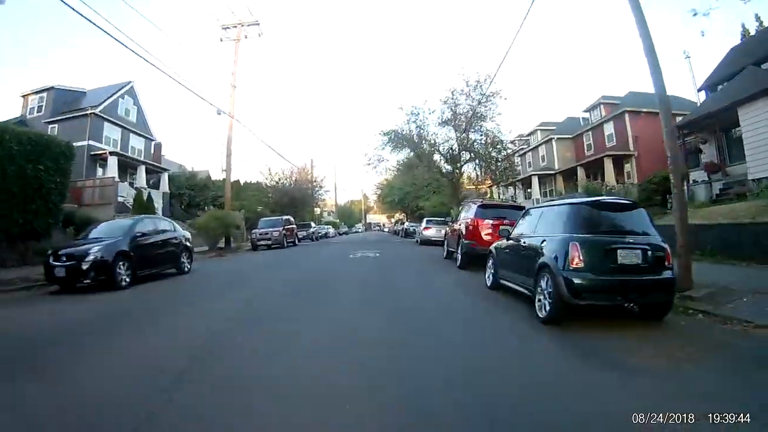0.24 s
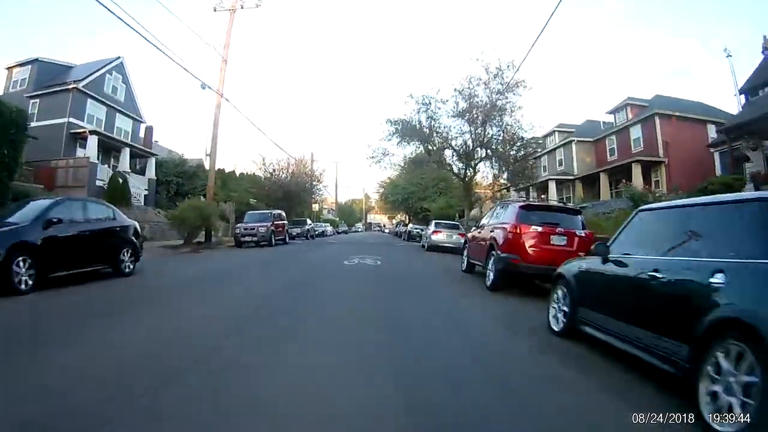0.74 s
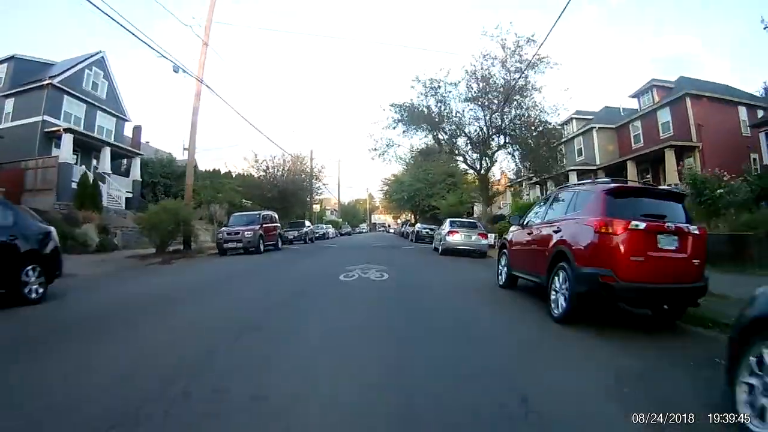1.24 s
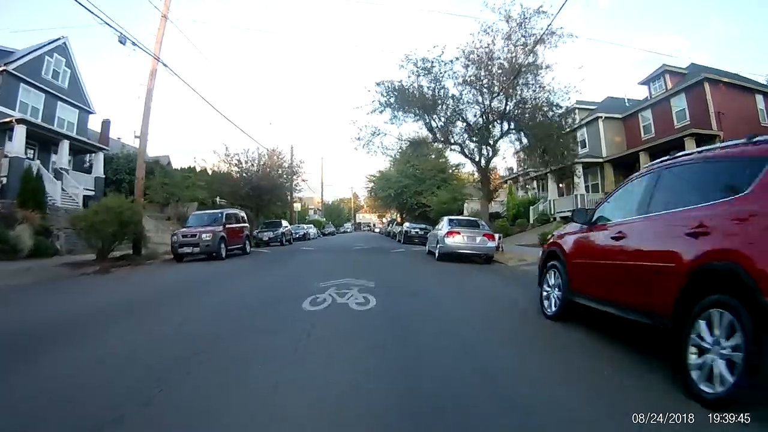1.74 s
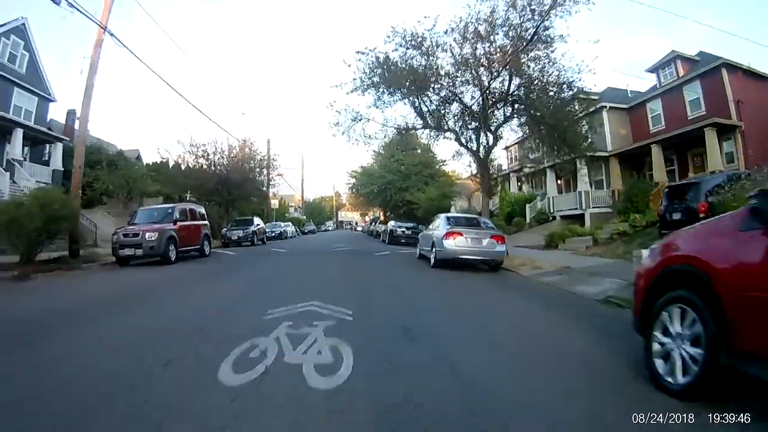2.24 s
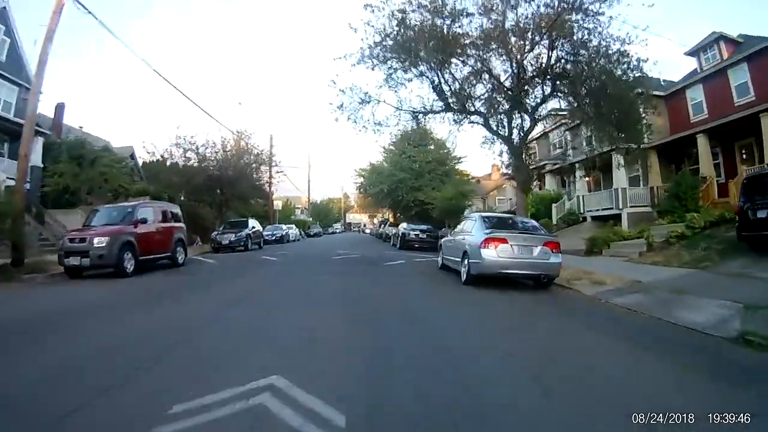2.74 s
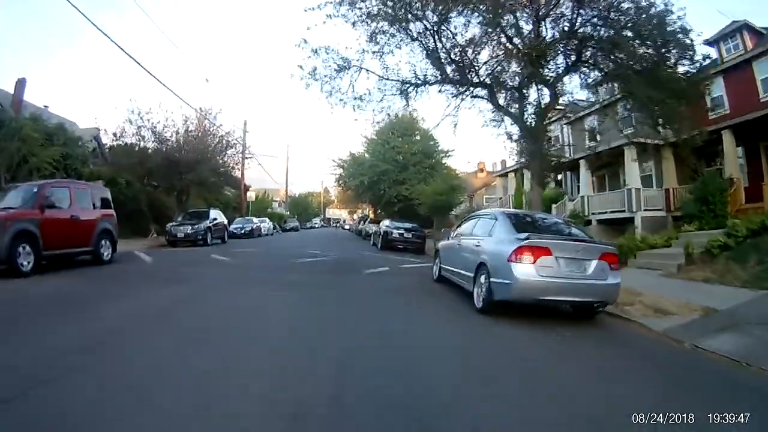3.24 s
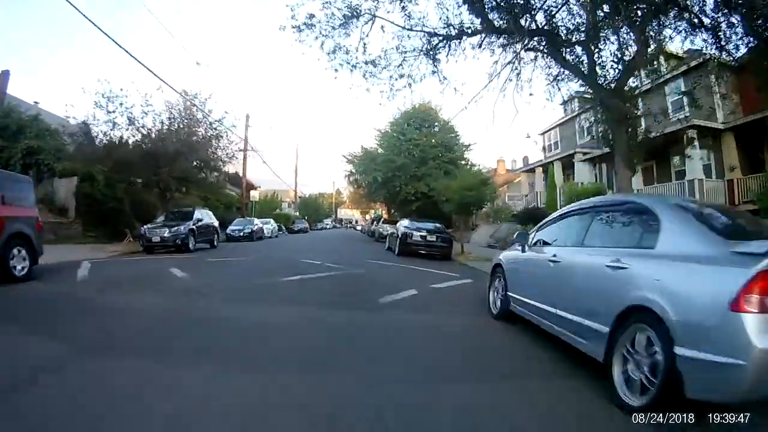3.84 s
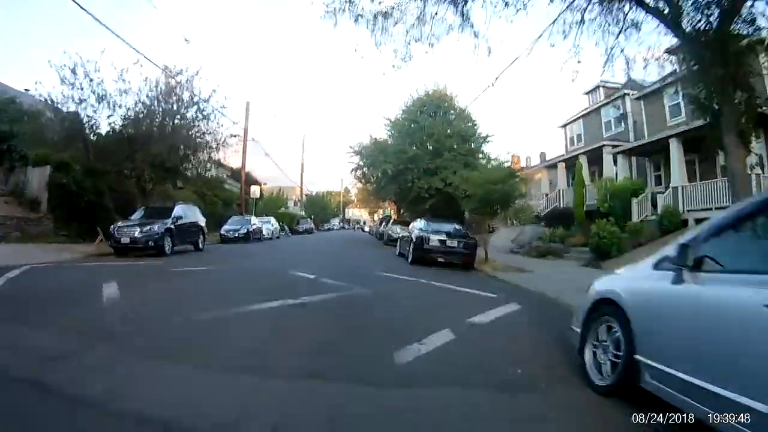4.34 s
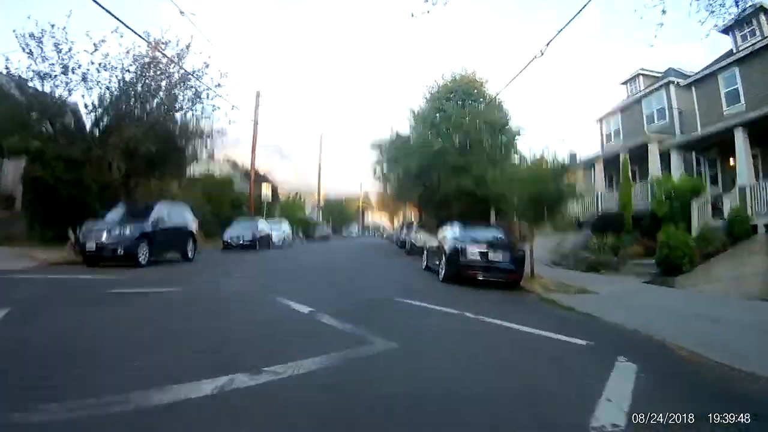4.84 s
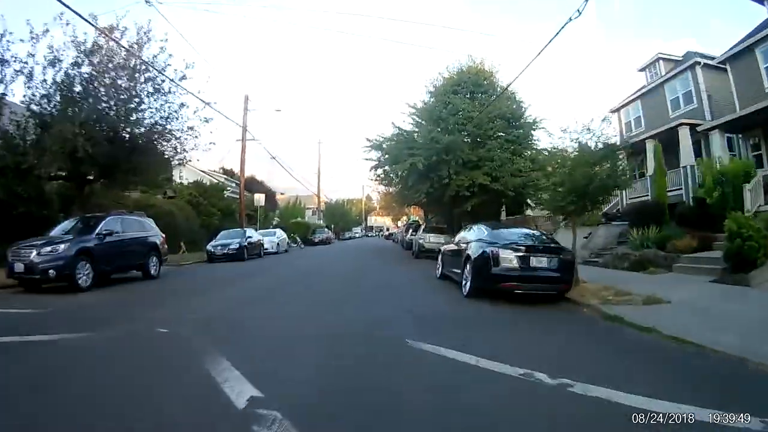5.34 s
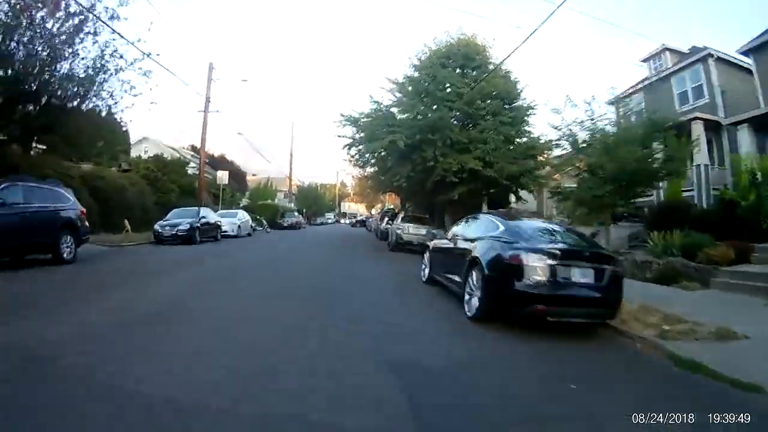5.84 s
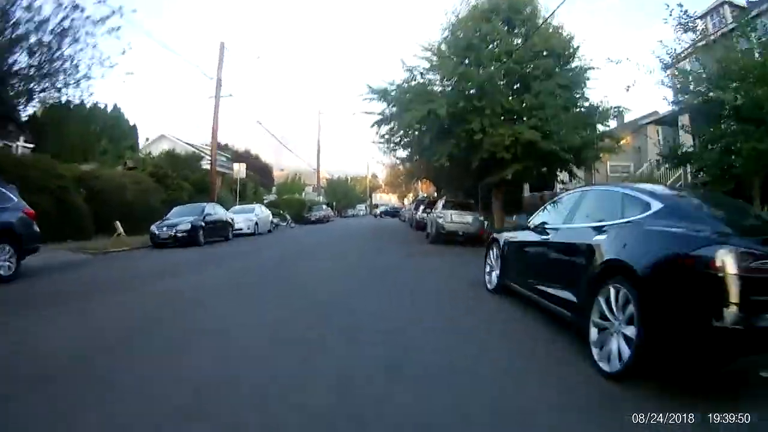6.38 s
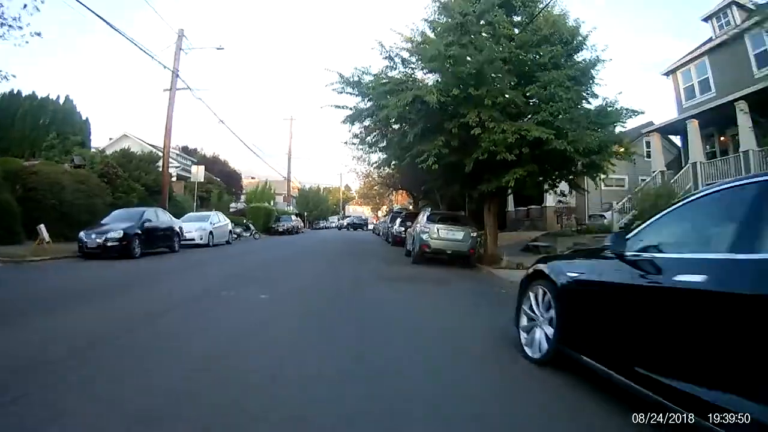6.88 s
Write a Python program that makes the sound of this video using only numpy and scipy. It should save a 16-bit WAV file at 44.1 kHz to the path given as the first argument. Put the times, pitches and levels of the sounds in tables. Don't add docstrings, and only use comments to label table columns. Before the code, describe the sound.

From a camera clamped to a moving bicycle, a steady low drone and midrange plasticky buzz run throughout, with a loose part tapping quickly and unevenly. Deep flutters sway underneath. Past the middle two hard knocks hit close together with low thumps and stronger rattling; near the end a third, heaviest jolt distorts the small microphone. The rolling then carries on.

```python
import sys
import numpy as np
from scipy import signal
from scipy.io import wavfile
from scipy.ndimage import uniform_filter1d

SR = 44100
rng = np.random.default_rng(int(sys.argv[2]) if len(sys.argv) > 2 else 0)


def volts(x):
    e = np.asarray(x, float) / 20
    return 10 ** e


def inscribe(sig):
    pcm = np.round(np.clip(np.atleast_2d(sig).T, -1, 1) * 32767)
    wavfile.write(sys.argv[1], SR, pcm.astype(np.int16))


N = 313551

# frequency in Hz, width in Hz, level when struck in dB,
# level when shaken by the road in dB.
SHELL_MODES = [(387, 18.4, -0.5, -29), (895, 108, -17.5, -5), (1094, 71, -7.5, -1.5), (1234, 27, -2.5, -13),
               (1414, 88, -4, 1), (1523, 206, -9, 2), (1684, 49.5, 1.8, -2.5), (1908, 100, -7, -13.5),
               (2047, 83, -4, -13), (2177, 210, -16.5, -11.5), (2698, 84, -4, -13.5),
               (3196, 82, -23.5, -19), (3783, 83, -12, -21.5), (4250, 180, -30, -36),
               (4840, 180, -29.5, -35.5), (5110, 680, -16, -46), (5390, 165, -12, -39),
               (5840, 190, -39, -42.5), (6500, 160, -54, -46), (6750, 100, -24, -52), (7180, 190, -26, -24)]
# start in seconds, signed jump in full scale, swing frequency in Hz,
# 60 dB decay time in seconds, rise time in seconds.
MOUNT_JUMPS = [
    (4.4607, .5, 8, .15, .009),
    (4.4753, -.78, 26, .13, .0013),
    (4.8933, -.55, 32, .12, .0012),
    (6.3395, 1.5, 5, .17, .017),
    (6.3566, -.95, 30, .12, .0003),
    (6.3585, -3.0, 23, .052, .004),
    (6.385, -.25, 30, .12, .004),
]


def unit(x):
    return x / np.sqrt(np.mean(x ** 2))


def ring(x, hz, width_hz):
    b, a = signal.iirpeak(hz, hz / width_hz, fs=SR)
    return signal.lfilter(b, a, x)


def walk(rate):
    hold = int(SR / rate)
    levels = np.repeat(rng.standard_normal(N // hold + 1), hold)
    return 0.83 * uniform_filter1d(uniform_filter1d(levels, hold), hold)[:N]


def swells(events):
    t = np.arange(N) / SR
    return sum(db * np.exp(-((t - start) / length) ** 2) for start, db, length in events)


def shaken(modes, flicker_db, shared_db, rate):
    road = rng.standard_normal((len(modes), N)) * volts(shared_db * walk(25))
    total = np.zeros(N)
    for force, (hz, width_hz, db) in zip(road, modes):
        mode = unit(ring(ring(force, hz, width_hz), hz, 3.58 * width_hz))
        total += volts(db + flicker_db * walk(rate)) * mode
    return unit(total)


def frame_drone(rock_db, grain_db, shudder_db):
    # frequency in Hz, width in Hz, level in dB.
    frame_modes = [(75, 41.6, -4), (205, 39.5, -4.5), (290.7, 87, -1.5), (383, 116, -2.5),
                   (465.5, 46.5, 0.5), (545.2, 32, -7), (710, 60, -37.5)]
    from_grain_db = 0.64 * (grain_db - grain_db.mean())
    from_rock_db = 0.017 * (rock_db - rock_db.mean())
    drone_db = -34.5 + from_grain_db + from_rock_db
    drone = shaken(frame_modes, flicker_db=2.0, shared_db=0.83, rate=9)
    return volts(drone_db + shudder_db + 1.5) * drone


def shell_buzz(grain_db, shudder_db):
    modes = [(hz, width_hz, shaken_db) for hz, width_hz, _, shaken_db in SHELL_MODES]
    buzz_db = grain_db + shudder_db - 1.33 * walk(10)
    return volts(buzz_db + 0.31) * shaken(modes, flicker_db=2.0, shared_db=2.8, rate=14)


def mount_sway(rock_db):
    # centre in seconds, extra level in dB, length in seconds.
    ridges = [(.09, 9, 0.043), (.56, 7, 0.057), (.96, 3.5, 0.058), (1.21, 5, 0.03), (1.76, 6, 0.036),
              (1.98, 5, 0.061), (2.25, 9.5, 0.041), (2.59, 4, .04), (2.73, 7.5, .03), (2.89, 1.5, .03),
              (3.13, 6, .09), (3.42, 5, 0.037), (3.6, 7, 0.062), (3.95, 8, .06), (4.16, 4, 0.021),
              (4.32, 8.5, .06), (4.73, 5, 0.035), (5.12, 8.5, 0.051), (5.86, 9, 0.056), (6.18, 3.5, 0.019),
              (7.0, 1.5, .05)]
    sway_hz, top_db, steadiness = 41, -19, 0.75
    db = rock_db + 3 + swells(ridges) + 3.5 * walk(9)
    x = ring(ring(rng.standard_normal(N), sway_hz, 9), sway_hz, 21)
    size = np.sqrt(uniform_filter1d(x ** 2, size=1075)) + 1e-6
    t = np.arange(N) / SR
    free = np.prod([1 - np.exp(-((t - jump[0] - 0.01) / 0.03) ** 2) for jump in MOUNT_JUMPS], axis=0)
    return free * volts(np.minimum(db, top_db)) * unit(x / size ** steadiness)


def chatter(times, gains, taus, first, habit):
    length = 2048
    out, t = np.zeros(N + length), np.arange(length) / SR
    usual = habit * rng.standard_normal(length)
    noises = rng.standard_normal((len(times), length))
    for start, gain, tau, noise in zip(times, gains, taus, noises):
        i = int(start * SR)
        out[i:i + length] += gain * (usual + noise) * np.exp(-t / max(tau, 1e-4))
        out[i] += gain * first
    return out[:N]


def struck(low, high):
    total = np.zeros(N)
    for k, (hz, width_hz, db, _) in enumerate(SHELL_MODES):
        blow = low if hz < 2400 else high
        total += (-1) ** k * volts(db) / np.sqrt(width_hz / 100) * ring(blow, hz, width_hz)
    return total


def rattle():
    # first tap in seconds, last tap in seconds, number of taps, peak in
    # dB.
    tap_runs = [(0.008, 0.094, 3, -32.5), (0.113, 0.133, 2, -32), (0.1587, 0.235, 3, -30),
                (0.281, 0.362, 3, -29), (0.408, 0.5013, 3, -28.8), (0.5363, 0.7118, 4, -28),
                (0.7484, 0.88, 3, -32.5), (0.921, 0.9945, 3, -30.5), (1.042, 1.082, 2, -33),
                (1.118, 1.15, 2, -35.5), (1.197, 1.234, 2, -36.5), (1.267, 1.358, 2, -37.5),
                (1.413, 1.467, 2, -25.5), (1.502, 1.545, 2, -30), (1.5943, 1.6746, 3, -31.5),
                (1.877, 1.9166, 2, -36), (1.952, 1.995, 2, -32.5), (2.036, 2.09, 2, -27.5),
                (2.129, 2.188, 2, -33), (2.225, 2.271, 2, -26.5), (2.307, 2.342, 2, -32),
                (2.4025, 2.571, 3, -35.5), (2.614, 2.646, 2, -34), (2.6873, 2.769, 3, -29.5),
                (2.804, 2.885, 3, -30), (2.9223, 3.0364, 3, -26), (3.083, 3.1456, 3, -31.5),
                (3.191, 3.333, 2, -35), (3.448, 3.536, 3, -41),
                (3.572, 3.572, 1, -39), (3.647, 3.6777, 2, -34.5), (3.7336, 3.846, 3, -27),
                     (3.873, 3.952, 2, -30), (3.988, 4.024, 2, -33), (4.069, 4.1027, 2, -32.5),
                     (4.138, 4.23, 3, -29), (4.2694, 4.298, 2, -34), (4.339, 4.3685, 2, -33.5),
                     (4.414, 4.415, 1, -31), (4.4558, 4.4548, 1, -20.5), (4.541, 4.541, 1, -20.5),
                     (4.615, 4.695, 2, -25.5), (4.781, 4.848, 2, -20.5), (4.9548, 5.0353, 2, -20),
                     (5.1056, 5.1862, 2, -23), (5.259, 5.313, 2, -30.5), (5.342, 5.41, 2, -42.5),
                     (5.5447, 5.6265, 3, -35.5), (5.6688, 5.72, 3, -37.5), (5.934, 6.0321, 4, -38.5),
                     (6.116, 6.116, 1, -42), (6.191, 6.243, 2, -30), (6.281, 6.305, 2, -32.5),
                     (6.4257, 6.4937, 2, -29), (6.573, 6.616, 2, -29), (6.6725, 6.7326, 2, -31.5),
                     (6.778, 6.911, 2, -38), (6.9587, 7.0663, 3, -33)]
    events = []
    for first, last, taps, peak_db in tap_runs:
        for k, start in enumerate(np.linspace(first, last, round(taps))):
            events.append((start, peak_db + 0.03 * k))
    times, db = np.transpose(events)
    chance = rng.standard_normal((len(times), 2)).T
    db = db + 0.66 * chance[0]
    body_db = 5 + 1.04 * chance[1]

    stray_taps = 60
    stray = rng.random((stray_taps, 2)).T
    times = np.append(times, stray[0] * N / SR)
    db = np.append(db, -48 + 3 * (2 * stray[1] - 1))
    body_db = np.append(body_db, np.full(stray_taps, 5))

    taus = 0.0036 * volts(0.31 * (db + 30))
    low = chatter(times, volts(db + body_db + 9.5), 2.25 * taus, first=5.1, habit=1.67)
    high = chatter(times, volts(db + 15.5), taus, first=2.6, habit=1.56)
    tap_lowpass = signal.butter(10, 7300, fs=SR, output="sos")
    return signal.sosfilt(tap_lowpass, struck(low, high))


def through_shell(x):
    # frequency in Hz, width in Hz, share removed as a fraction.
    dead_spots = [(679, 140, 0.61), (1804, 96, .7), (2553, 93, 0.94), (3510, 89, 0.49), (4450, 110, 0.64),
                  (5845, 810, 0.95)]
    for hz, width_hz, share in dead_spots:
        x = x - min(share, 1) * ring(x, hz, width_hz)
    return x


def knocks():
    # start in seconds, crack in dB, shell ring in dB, clamp clonk in dB,
    # chatter decay in seconds.
    knock_events = [(4.32, -54, -49, -36, 0.017), (4.4575, -42, -24.5, -15, 0.0011),
                    (4.4615, -38, -39, -26, 0.021), (4.4748, -40, -28, -3.5, 0.00079),
                    (4.8922, -2, -17, -6.5, 0.0014), (5.127, -57, -35, -19, 0.0057),
                    (6.3372, -25, -39, 1, 0.0016), (6.344, -37, -20, -17.5, 0.0074),
                    (6.3523, -2, -17.5, -2.5, 0.0012), (6.357, -13, -26.5, 0, 0.00057),
                    (6.3688, -12, -11.5, -7, 0.0016), (6.385, -3, -46, -11, 0.001)]
    # frequency in Hz, width in Hz, level in dB.
    clamp_modes = [(690, 200, -1.5), (1320, 153, -1), (2734, 570, -17.5)]
    times, crack_db, ring_db, clonk_db, taus = np.transpose(knock_events)
    edge = chatter(times, volts(crack_db - 7), taus, first=4.0, habit=0)
    crack = ring(ring(edge, 2500, 4000), 2600, 5200) + volts(-23) * edge
    blow = chatter(times, volts(ring_db + 19.0), taus, first=1.5, habit=0)
    shell = struck(blow, volts(-14.5) * blow)
    push = chatter(times, volts(clonk_db + 15.5), taus, first=2.56, habit=0)
    clonk = sum(volts(db) * ring(ring(push, hz, width_hz), hz, 5.6 * width_hz)
                for hz, width_hz, db in clamp_modes)
    return crack + shell + clonk


def bumps():
    out, t = np.zeros(N), np.arange(N) / SR
    for start, jump, hz, t60, rise in MOUNT_JUMPS:
        since = np.maximum(t - start, 0)
        decay = np.exp(-np.log(1000) * since / t60)
        out += jump * np.minimum(since / rise, 1) * decay * np.cos(2 * np.pi * hz * since)
    return out


def scene():
    # time in seconds, rocking of the mount in dB,
    # grain of the tarmac in dB.
    ride = [(0.0, -37.5, -35.5), (1.15, -33, -36), (1.62, -37.5, -37), (3.01, -32, -37.5), (3.21, -30, -40),
            (3.68, -40.5, -36.5), (4.45, -26.5, -37.5), (4.99, -28, -35), (5.21, -31, -38.5),
            (5.64, -38, -39), (6.12, -34, -39.5), (6.34, -25.5, -36), (6.69, -33.5, -35),
            (7.11, -31, -38.5)]
    # centre in seconds, extra level in dB, length in seconds.
    shudders = [
        (4.466, 8.5, 0.022),
        (6.36, 8, .03),
    ]
    t = np.arange(N) / SR
    times, *columns = np.transpose(ride)
    rock_db, grain_db = (np.interp(t, times, column) for column in columns)
    shudder_db = swells(shudders)
    drone = frame_drone(rock_db, grain_db, shudder_db)
    buzz = shell_buzz(grain_db, shudder_db)
    rocking = mount_sway(rock_db)
    mix = rocking + through_shell(drone + buzz + rattle()) + knocks() + bumps()
    return mix[None]


def top_cut(x):
    return signal.sosfilt(signal.butter(12, 15830, fs=SR, output="sos"), x)


def record(dry):
    overloaded = np.clip(dry, -0.72, 1.1)
    kept = signal.sosfilt(signal.cheby2(12, 60, 7900, fs=SR, output="sos"), overloaded)
    leak = signal.sosfilt(signal.butter(5, [8700, 11800], "band", fs=SR, output="sos"), dry)
    b, a = signal.butter(1, 14, "high", fs=SR)
    x = signal.lfilter(b, a, kept + volts(-12.5) * leak)
    hiss_db = -92 + 16 * np.repeat(rng.random(N // 1024 + 2), 1024)[666:N + 666]
    hiss = volts(hiss_db) * rng.standard_normal(x.shape)
    return top_cut(np.clip(x, -1, 1) + hiss)


dry = scene()
out = record(dry)
inscribe(out)
```